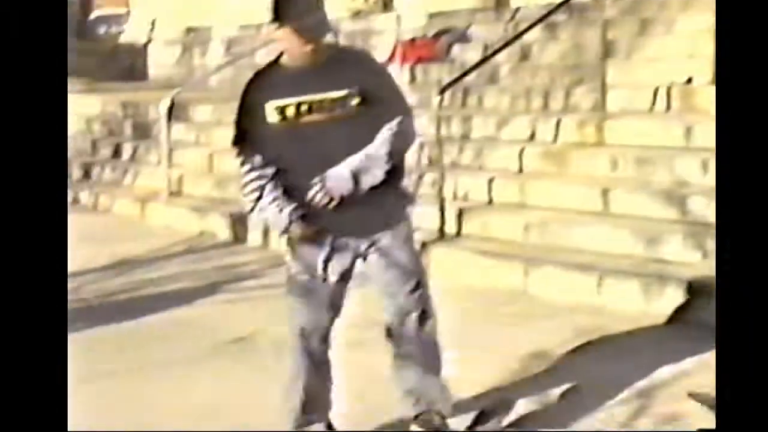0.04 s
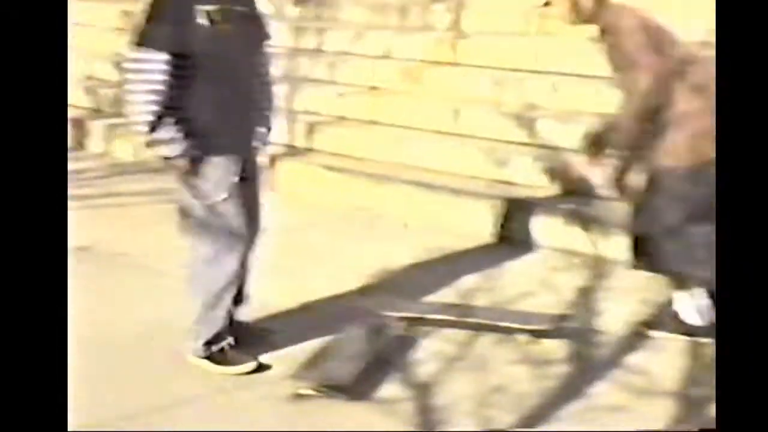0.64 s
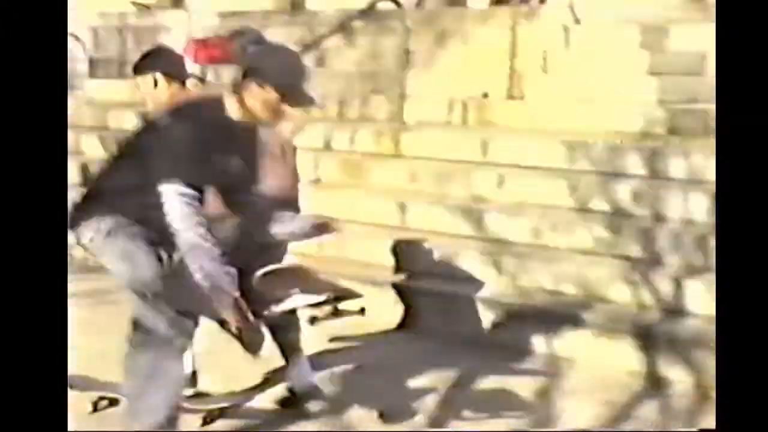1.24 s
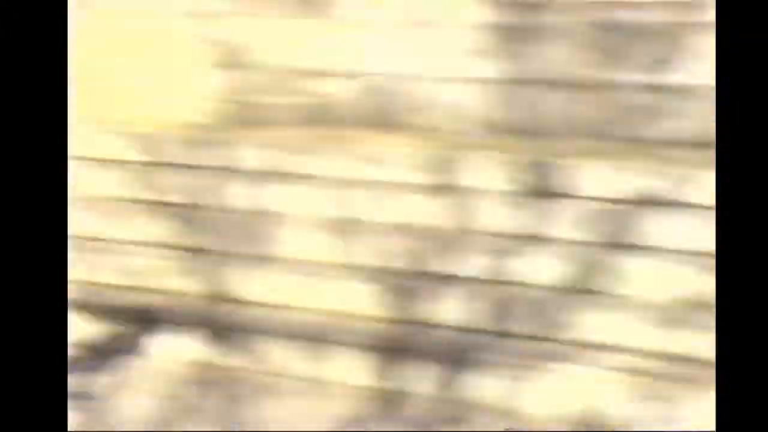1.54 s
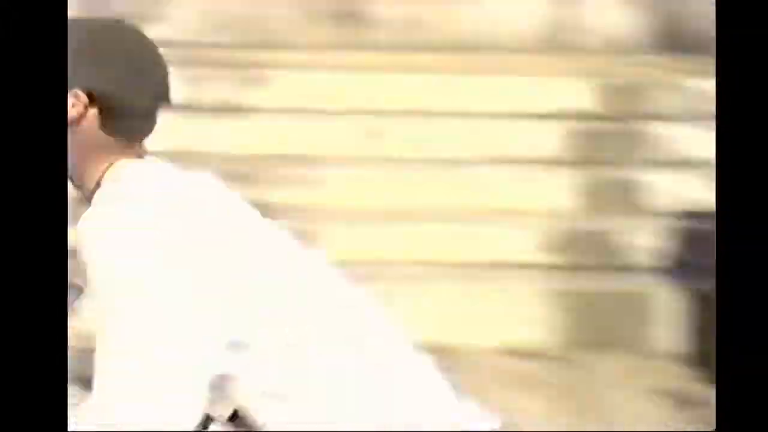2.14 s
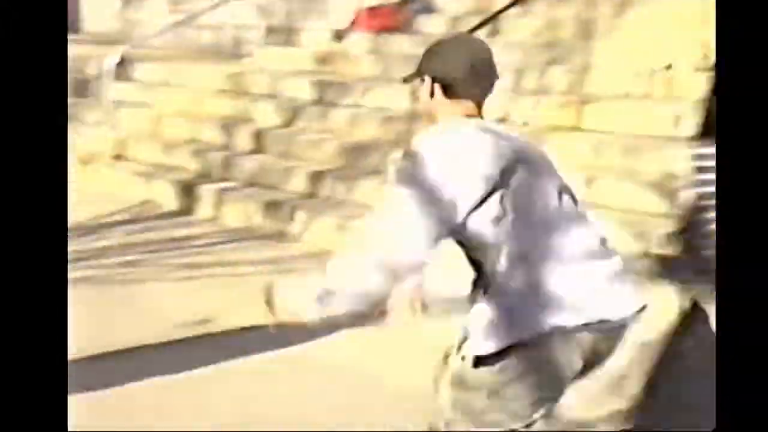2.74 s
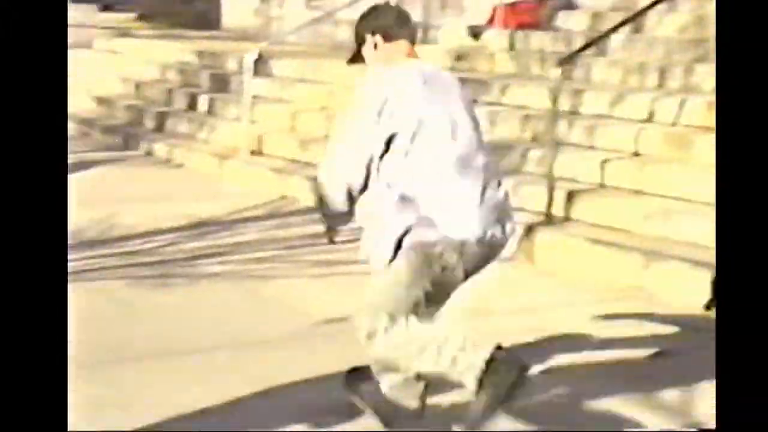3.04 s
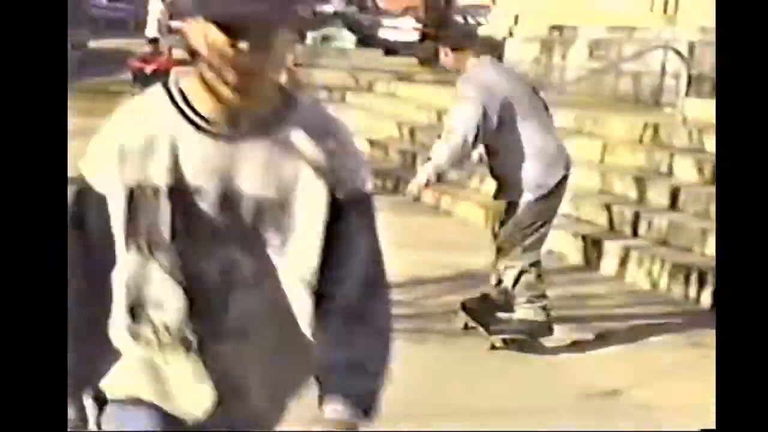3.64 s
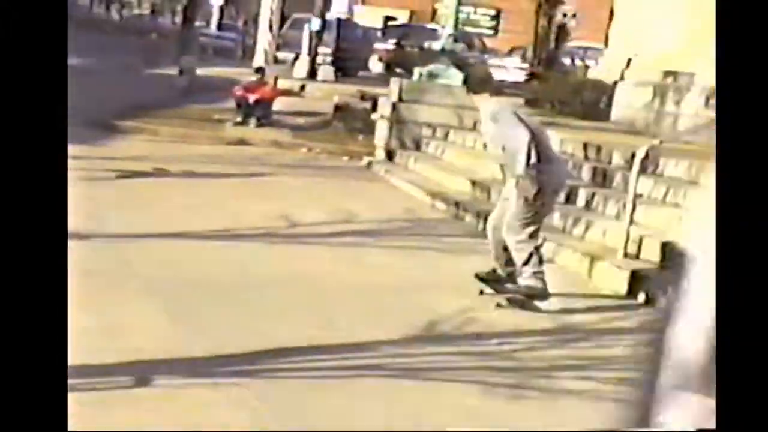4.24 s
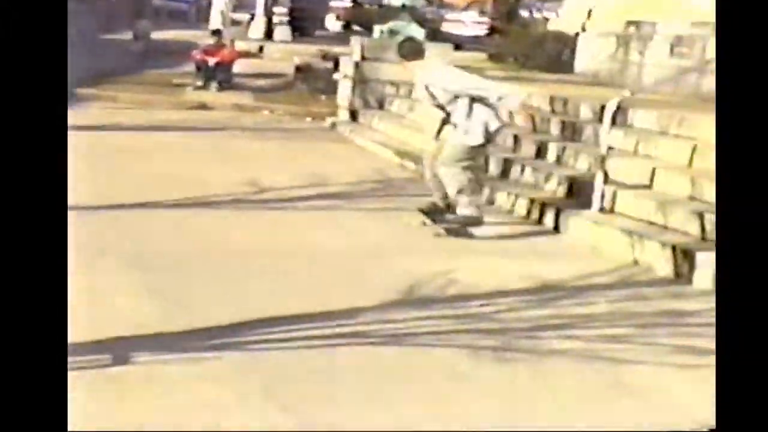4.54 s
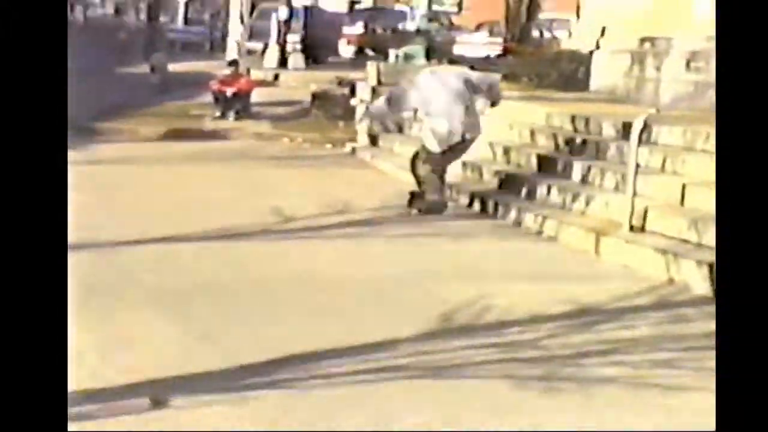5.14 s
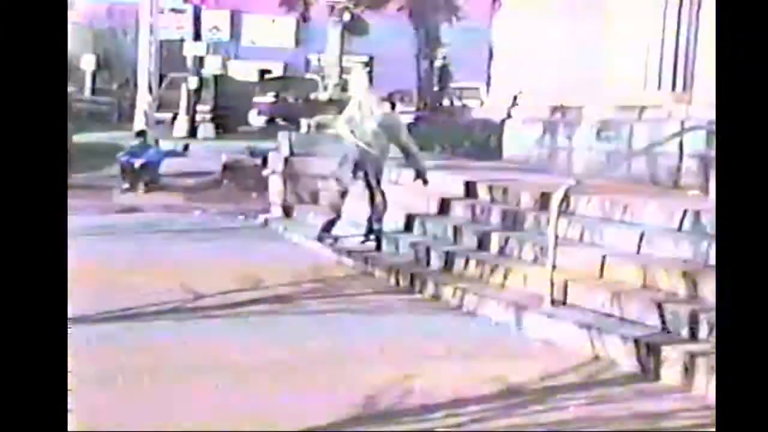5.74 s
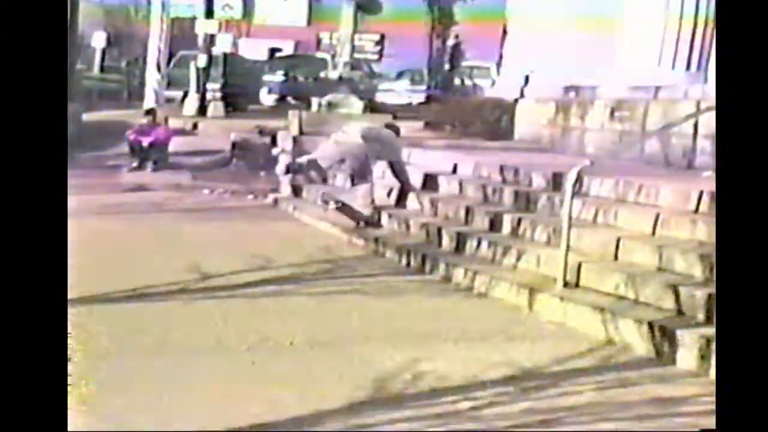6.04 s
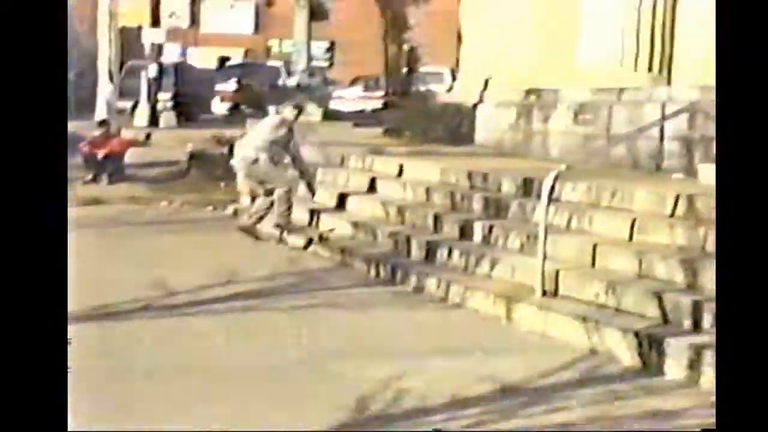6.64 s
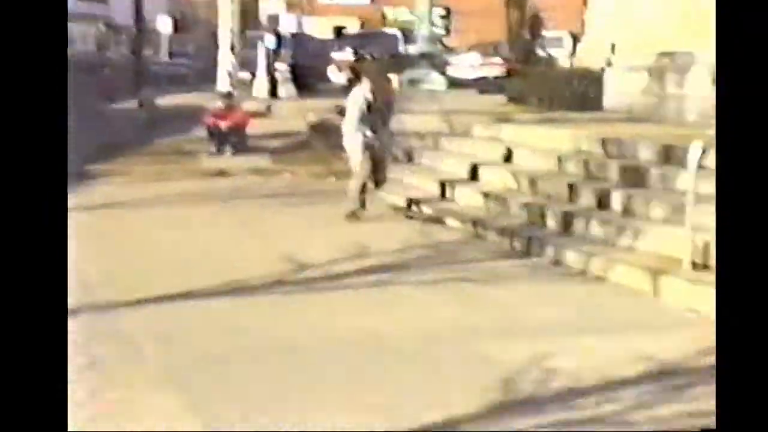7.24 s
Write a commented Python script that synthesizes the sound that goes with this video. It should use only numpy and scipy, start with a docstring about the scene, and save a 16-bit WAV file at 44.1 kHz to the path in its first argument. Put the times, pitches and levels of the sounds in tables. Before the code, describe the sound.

Skateboards clack and knock on a concrete plaza as one rider rumbles past, scrapes the wheels and loses the board.

```python
"""A concrete plaza with stone steps, heard through the mono microphone of an old camcorder.
A few skateboards clack; one rider rolls past about half a metre away, rides off, hits a step and bails.
Hard wheels drum over the grain of the concrete, shake the deck and ring, and grit hisses under them.
Joints and landings knock, wheels scuff sideways, and the steps throw both back. Behind it all lie
town air and the hum of the camcorder, which has a narrow sound track and a quick limiter."""
import sys
import numpy as np
from scipy import signal
from scipy.fft import rfft, irfft
from scipy.io import wavfile
from scipy.ndimage import uniform_filter1d, minimum_filter1d

SR = 44100
rng = np.random.default_rng(int(sys.argv[2]) if len(sys.argv) > 2 else 0)


def file_out(sig):
    """Save sig as 16-bit WAV at sys.argv[1]."""
    # one column per channel
    cols = np.atleast_2d(sig).T
    # limit, then scale
    lim = np.clip(cols, -1, 1)
    pcm = np.round(lim * 32767).astype(np.int16)
    wavfile.write(sys.argv[1], SR, pcm)


N = 321914

# The rolling at the microphone. Each row: time in seconds, then rumble, rasp and grit in relative dB.
ROLL_LEVELS = [(0.36, -51, -40, -30.5), (0.62, -47.5, -40.5, -32.5), (1.03, -47.5, -33.5, -27.5),
               (1.23, -35.5, -25.5, -22.5), (1.4, -34, -27.5, -22), (1.77, -32.5, -26, -24),
               (2.02, -25, -27, -25), (2.32, -28.5, -26.5, -24.5), (2.42, -28.5, -24.5, -20),
               (2.57, -31.5, -26, -24.5), (2.87, -33, -25.5, -25), (3.24, -28.5, -25.5, -26.5),
               (3.6, -26.5, -27.5, -22.5), (3.78, -27.5, -22.5, -22), (3.86, -33.5, -25.5, -26.5),
               (4.35, -31, -29.5, -26), (4.57, -22.5, -29, -30.5), (4.77, -28.5, -31.5, -32),
               (5.07, -30, -25, -25), (5.26, -30, -27.5, -28), (5.6, -26, -24.5, -24.5),
               (5.83, -34.5, -27, -29), (6.06, -32, -27.5, -23.5), (6.28, -31, -28.5, -31),
               (6.42, -33.5, -32.5, -33), (6.48, -34, -26, -25.5), (6.66, -30, -24.5, -25),
               (6.78, -35.5, -26, -21.5), (7.28, -38.5, -32.5, -32.5)]
# Brief dips in the rolling. Each row: middle in seconds, level change in dB.
ROLL_DIPS = [(1.195, -5), (1.405, -6.5), (2.09, -2.5), (2.736, -3.5), (4.015, -4), (7.0, -4)]
# Low throb of the loaded deck. Each row: time in seconds, level against the rumble curve in dB.
DECK_THROB = [(0.9, -17), (1.3, -5), (2.2, -17), (3.2, -10.5), (4.6, -15.5), (5.0, -18)]
# Spectra of deck rumble, wheel rasp and grit hiss. Each row: frequency in Hz, relative level in dB.
RUMBLE_SPECTRUM = [(50, -18.5), (100, -35), (150, -28.5), (220, -3), (340, 2), (430, 0.5), (550, 4),
                   (780, -0.5), (950, -5), (1300, -5), (2000, -68.5)]
RASP_SPECTRUM = [(500, -33), (800, -1.5), (1000, 0), (1150, -1.5), (1400, 2), (1800, 0.5), (2300, -2.5),
                 (2800, -18), (4000, -23)]
GRIT_SPECTRUM = [(1500, -41.5), (2200, -3.5), (2700, -1), (3500, 0), (4200, -1.5), (4900, -0.8),
                 (5800, -3.5), (7000, -11.5), (9000, -7)]
# Wheel resonances. Each row: frequency in Hz, width in Hz, relative level in dB.
WHEEL_MODES = [(566, 55, -7), (682, 42, -2.5), (737.6, 19.5, 1)]
# The wheels' ring bends as the rider carves past. Each row: time in seconds, pitch ratio.
WHEEL_BEND = [(2.0, 1.06), (2.2, 0.99), (2.3, 1.1), (2.45, 1.06), (2.56, 0.95), (3.6, 1.06)]
# Joints in the concrete. Each row: start in seconds, boost of the wheels' ring in dB.
SLAB_JOINTS = [(2.124, 7), (2.19, 9.3), (2.259, 7.1), (2.435, 2.9), (3.643, 9.7)]
# Blows of wheels, tail and deck. Each row: start in seconds, then wooden clack, thump and crack
# in relative dB, and the seconds the rattle takes to fall 60 dB.
BLOWS = [(0.189, -23.5, -45, -65, 0.018), (0.2765, -21, -72, -28, 0.055), (0.403, -17, -30, -29, .11),
         (0.4641, -28, -35, -37, 0.067), (0.4939, -24, -48, -30, 0.1), (0.6722, -33, -68, -31.5, .02),
         (0.9674, -29, -38, -33, 0.089), (1.0769, -19.5, -21, -22.5, 0.076), (1.1071, -23, -29, -30, 0.13),
         (1.153, -27, -31, -26.5, 0.085), (1.2272, -19.5, -20.5, -23, 0.11),
         (1.2968, -15.5, -18, -24, 0.14), (1.4857, -24, -24, -29.5, 0.083), (1.648, -22, -51, -36, 0.12),
         (1.803, -21, -26, -28, 0.098), (2.126, -21, -13, -24.5, .035), (2.179, -23.5, -48, -27.5, 0.21),
         (2.2665, -17, -38, -25, 0.096), (2.444, -18, -17.5, -26, .09), (2.5449, -22, -22.5, -28, 0.043),
         (2.626, -24, -22, -30, 0.12), (2.7713, -25, -21.5, -27.5, 0.099), (3.035, -31, -25, -28, 0.18),
         (3.568, -20, -27, -29, 0.12), (3.6758, -21.5, -19, -35, 0.13), (4.0381, -24.5, -25, -28, 0.11),
         (4.489, -23.5, -19.5, -28.5, 0.13), (4.532, -24, -38, -27, 0.089), (4.647, -27, -25, -27.5, 0.083),
         (4.675, -19, -18.5, -29, 0.068), (5.025, -31, -30, -29, 0.065), (5.141, -30, -26, -26.5, 0.2),
         (5.361, -29, -26, -47, 0.038), (5.4604, -33, -24, -29.5, 0.17), (5.5717, -41, -23.5, -30, 0.11),
         (5.62, -18, -30, -29, 0.21), (5.9006, -25.5, -41, -26.5, 0.11), (6.065, -26, -36, -36, 0.054),
         (6.087, -25, -27, -25, 0.06), (6.1222, -22, -19, -30, 0.08), (6.1878, -17, -41, -25, 0.039),
         (6.328, -31, -29, -28, 0.061), (6.4602, -20, -31, -27, .08), (6.477, -26, -30, -26, 0.087),
         (6.518, -25, -23.5, -29, 0.22), (6.567, -29, -26, -32, 0.14), (6.631, -29, -26, -28.5, 0.1),
         (6.6891, -29, -22.5, -40, .09), (6.7025, -18, -33, -31, 0.09), (6.967, -25, -31.5, -33, 0.083),
         (7.0136, -22, -42, -29, .022), (7.0286, -15.5, -20.5, -21, .05), (7.046, -22, -19.5, -30, 0.048),
         (7.06, -24.5, -29, -34, 0.34), (7.128, -21, -26, -31, 0.045), (7.164, -26.5, -36, -29.5, .09)]
# Deck and truck modes. Each row: frequency in Hz, relative level in dB, seconds to fall 60 dB.
DECK_MODES = [(276, -13, 0.03), (557, 0.5, 0.12), (786, 4, 0.019), (1150, -22, 0.036), (1470, -2.5, 0.044),
              (1740, -5.5, 0.034), (2260, -4.5, 0.016), (3930, -4.5, 0.027)]
# Slides of wheels and soles. Each row: middle in seconds, half length in seconds, centre in Hz,
# level in dB, resonance width as a share of the centre.
SLIDES = [(1.464, 0.024, 4370, -29.5, 0.85), (1.69, 0.04, 2440, -24, 0.42),
          (1.742, 0.062, 2890, -25.5, .11), (1.858, 0.04, 3170, -29, 0.11), (1.973, 0.04, 3900, -24.5, .55),
          (2.29, 0.032, 2620, -24, 0.34), (2.392, 0.038, 1890, -21, 0.31), (2.464, 0.016, 1690, -20, 0.64),
          (2.496, 0.04, 2170, -31, .25), (2.9, 0.04, 3500, -26, .4), (2.932, 0.043, 1740, -28.5, 0.27),
          (3.104, 0.035, 3500, -22, 0.61), (3.203, 0.019, 2500, -19.5, 1), (3.684, 0.022, 950, -22, 0.35),
          (3.8, 0.011, 1292, -17.5, 0.78), (3.802, 0.051, 1750, -27, 0.46), (3.906, 0.042, 1581, -25, 0.79),
          (3.959, 0.0099, 1180, -15.5, 0.63), (5.471, 0.028, 1173, -23, 0.52),
          (5.659, 0.033, 3400, -23, 0.69), (5.724, 0.08, 1990, -26, 1.1), (5.977, 0.045, 5100, -27, 0.44),
          (6.21, 0.022, 3390, -24.5, 0.51), (6.74, 0.021, 3500, -21, 0.61),
          (6.798, 0.041, 4100, -27.5, 0.42), (7.042, 0.008, 3280, -17, 0.47),
          (7.064, 0.0078, 3340, -19, 0.64)]
# The deck gives under the rider. Each row: start in seconds, relative level in dB.
DECK_FLEXES = [(1.964, -33), (2.263, -32), (2.391, -30.5), (2.645, -29), (3.05, -29), (3.2, -23),
               (4.48, -24), (5.576, -43), (6.181, -35), (7.041, -31.5)]
# Spectrum of town air and tape hiss. Each row: frequency in Hz, relative level in dB.
AIR_SPECTRUM = [(30, -23), (60, 10.5), (90, 0.5), (130, -6.5), (185, 2.5), (260, 0), (500, -2.5), (1500, 5),
                (3000, -2.5), (5000, 7), (8000, -6.5)]
# Camcorder motor and mains hum. Each row: frequency in Hz, rms level in dB.
HUM_TONES = [(29.6, -59), (59.6, -54.5), (87, -53), (177.6, -55.5)]

PASS_S, PASS_DISTANCE_M, SPEED_M_PER_S = 2.34, 0.58, 7.1
BAIL_S, SPIN_DOWN_DB_PER_S = 5.72, 29


def rolling():
    """Coarse bumps shake the deck, finer grain rasps through wheels and trucks, grit hisses."""
    rumble_db, rasp_db, grit_db = roll_levels()
    throb_db, = curves(DECK_THROB)
    load = drift(rate_hz=18)  # the wheels press and lift together over the uneven slab
    rumble = colour(grains(per_s=1300, spread_db=1), RUMBLE_SPECTRUM)
    rumble *= from_db(rumble_db - 0.98 + 0.43 * load)
    rasp = colour(grains(per_s=3600, spread_db=2), RASP_SPECTRUM) * from_db(rasp_db - 0.53 + 1.7 * load)
    grit = colour(grains(per_s=18000, spread_db=2), GRIT_SPECTRUM) * from_db(grit_db + 1.1 + 1.6 * load)
    throb = resonate(grains(per_s=120, spread_db=4.5), hz=172, width_hz=69)
    throb = resonate(throb, hz=154, width_hz=430)
    return rumble + rasp + grit + from_db(rumble_db + throb_db) * unit_power(throb)


def roll_levels():
    """Rumble, rasp and grit in dB, rising as the boards start to roll and dipping here and there."""
    t = seconds()
    start_db = 20 * np.log10(np.clip((t - 0.26) / 0.2, 0.3, 1))
    dips_db = sum(db * bell(t - middle_s, width_s=0.038) for middle_s, db in ROLL_DIPS)
    return [level_db + start_db + dips_db for level_db in curves(ROLL_LEVELS)]


def wheel_ring():
    """Bumps keep the hard wheels ringing until the bail, louder at joints and near the microphone."""
    t = seconds()
    bumps = grains(per_s=1500, spread_db=1) * from_db(2 * drift(rate_hz=86))
    ring = sum(from_db(db) * resonate(bumps, hz, width_hz) * (-1) ** k
               for k, (hz, width_hz, db) in enumerate(WHEEL_MODES))
    ring = butterworth(ring, [500, 950], "band")
    power = np.abs(uniform_filter1d(ring ** 2, int(0.072 * SR)))
    ring /= np.sqrt(power + 1e-9)  # holds the level even
    pitch = curves(WHEEL_BEND)[0] + 0.0118 * drift(rate_hz=11.62)  # wanders as the load changes
    ring = np.interp(np.cumsum(pitch), np.arange(N), ring, right=0)
    follow_db = np.minimum(roll_levels()[0], -29) - 5  # grows with the rumble, up to a cap
    distance_m = np.hypot(PASS_DISTANCE_M, SPEED_M_PER_S * (t - PASS_S))  # a straight pass
    near_db = 7 * PASS_DISTANCE_M / distance_m
    joints_db = sum(db * (t > start_s) * bell(t - start_s, width_s=0.031) for start_s, db in SLAB_JOINTS)
    spin_down_db = SPIN_DOWN_DB_PER_S * np.maximum(t - BAIL_S, 0)
    return from_db(follow_db + near_db + joints_db - spin_down_db) * unit_power(ring)


def clacks():
    """Each blow is a sharp contact, a brief crush and a dying truck rattle that set the deck ringing."""
    attack_s, crush_s = 0.0014, 0.0055
    size = SR // 3
    t, out = np.arange(size) / SR, np.zeros(N + size)
    contact = from_db(14.5) * (t == 0)
    noises = rng.standard_normal((len(BLOWS), 3, size))
    spots = rng.standard_normal((len(BLOWS), len(DECK_MODES)))  # each spot on a board has its own ring
    clatter = unit_power(from_db(1.36 * drift(rate_hz=110)))  # loose parts strike again unevenly
    clatter = np.pad(clatter, (0, size))
    for (start_s, clack_db, thump_db, crack_db, t60_s), noise, spot in zip(BLOWS, noises, spots):
        at = int(start_s * SR)
        envelope = np.minimum(t / attack_s, 1) * from_db(-60 * np.maximum(t - crush_s, 0) / t60_s)
        low, middle, high = noise * clatter[at:at + size] * envelope
        clack_hz = 1460 * 2 ** ((clack_db - thump_db) / 58)  # a heavier blow sounds lower
        wood = butterworth(middle + contact, [0.65 * clack_hz, 1.28 * clack_hz], "band")
        blow = from_db(clack_db) * wood * np.sqrt(SR / 2 / clack_hz)  # a wider band keeps the same power
        blow += from_db(thump_db - 4.5) * colour(low, RUMBLE_SPECTRUM)
        blow += from_db(crack_db + 6.5) * colour(high, GRIT_SPECTRUM)
        ring = sum(from_db(db) * resonate(blow, hz * (1 + 0.07 * detune), np.log(1000) / np.pi / ring_s)
                   for (hz, db, ring_s), detune in zip(DECK_MODES, spot))
        out[at:at + size] += blow + from_db(4) * ring
    return out[:N]


def scuffs():
    """A sliding wheel or sole sticks and slips in a chattering band: hoarse if wide, thin if narrow."""
    out, t = np.zeros(N), seconds()
    slips = grains(per_s=12000, spread_db=2)
    chatter = unit_power(from_db(2.5 * drift(rate_hz=50)))
    for middle_s, half_s, hz, db, width in SLIDES:
        span = slice(*np.searchsorted(t, [middle_s - 0.3, middle_s + 0.3]))
        band = resonate(slips[span], hz, width * hz)
        band = unit_power(resonate(band, hz, width * hz))
        out[span] += from_db(db) * band * chatter[span] * bell(t[span] - middle_s, half_s)
    return out


def thuds():
    """The deck flexes under the rider's weight: a few low cycles that swell and die."""
    flex_hz, attack_s, decay_s = 151, 0.003, 0.016
    out, t = np.zeros(N + SR), np.arange(SR // 4) / SR
    envelope = np.minimum(t / attack_s, 1) * np.exp(-t / decay_s)
    for (start_s, db), detune in zip(DECK_FLEXES, rng.standard_normal(len(DECK_FLEXES))):
        swing = np.sin(2 * np.pi * flex_hz * (1 + 0.12 * detune) * t)
        out[int(start_s * SR):][:len(t)] += from_db(db + 2) * swing * envelope
    return out[:N]


def plaza_echoes(x, t60_s, delay_s):
    """The stone steps throw a dense, quickly dying scatter of echoes back to the microphone."""
    t = np.arange(SR) / SR
    scatter = rng.standard_normal(SR) * from_db(-60 * t / t60_s) * (t > delay_s)
    scatter = resonate(scatter, hz=1500, width_hz=9600)
    return signal.fftconvolve(x, scatter / np.linalg.norm(scatter))[:N]


def background():
    """Town air, tape hiss and the camcorder's wavering hum."""
    hum = sum(from_db(db) * np.sqrt(2) * np.sin(2 * np.pi * hz * seconds() + drift(rate_hz=0.86))
              for hz, db in HUM_TONES)
    return hum + from_db(-37) * colour(rng.standard_normal(N), AIR_SPECTRUM)


def limiter(x, ceiling_db, release_db_per_s):
    """The camcorder's gain drops just in time for loud peaks and creeps back."""
    over_db = np.maximum(20 * np.log10(np.abs(x) + 1e-9) - ceiling_db, 0)
    creep_db = release_db_per_s * seconds()
    gain_db = creep_db - np.maximum.accumulate(over_db + creep_db, axis=-1)
    return x * from_db(uniform_filter1d(minimum_filter1d(gain_db, size=24), size=24))


def grains(per_s, spread_db):
    """Random tiny impacts of uneven size, at unit power."""
    sizes = from_db(spread_db * np.minimum(rng.exponential(1, N), 4)) * rng.choice([-1, 1], N)
    return unit_power(sizes * (rng.random(N) < per_s / SR))


def drift(rate_hz):
    """A smooth random wander with a spread of about 1."""
    step, settle = 20, 2000
    pole = np.exp(-2 * np.pi * rate_hz * step / SR)
    noise = rng.standard_normal(N // step + settle + 2)
    slow = signal.lfilter([1], [1, -2 * pole, pole * pole], noise)[settle:]
    return np.interp(np.arange(N) / step, np.arange(len(slow)), unit_power(slow))


def colour(x, spectrum):
    """A causal filter with the given spectrum; white noise keeps its power."""
    size = 4096
    hz, db = np.transpose(spectrum)
    bins_hz = np.arange(size // 2 + 1) * SR / size
    gain = from_db(np.interp(np.log(bins_hz + 1), np.log(hz), db))
    cepstrum = irfft(np.log(gain))
    cepstrum[1:size // 2] *= 2  # folded for minimum phase
    cepstrum[size // 2 + 1:] = 0
    response = irfft(np.exp(rfft(cepstrum)))
    return signal.fftconvolve(x, response / np.linalg.norm(response))[:len(x)]


def resonate(x, hz, width_hz):
    """A resonance with gain 1 at its peak."""
    r = np.exp(-np.pi * width_hz / SR)
    feedback = [1, -2 * r * np.cos(2 * np.pi * hz / SR), r * r]
    return signal.lfilter(np.array([1, 0, -1]) * (1 - r * r) / 2, feedback, x)


def butterworth(x, hz, kind, order=2):
    """A filter with a flat passband."""
    return signal.sosfilt(signal.butter(order, hz, kind, fs=SR, output="sos"), x)


def bell(t, width_s):
    """A smooth bump, 1 at time zero and 1/e at width_s either side."""
    return np.exp(-(t / width_s) ** 2)


def curves(rows):
    """Each column after the time column, interpolated at every sample."""
    times_s, *columns = np.transpose(rows)
    return [np.interp(seconds(), times_s, column) for column in columns]


def from_db(db):
    """Decibels to gain."""
    return 10 ** (np.asarray(db) / 20)


def unit_power(x):
    """Scale to an rms of 1."""
    return x / np.sqrt(np.mean(x ** 2) + 1e-20)


def seconds():
    """The time of every sample."""
    return np.arange(N) / SR


def scene():
    """At the microphone, in mono: the boards, echoes of their clacks and scuffs, and the background."""
    contacts = clacks() + scuffs()
    boards = rolling() + wheel_ring() + thuds() + contacts
    echoes = from_db(-10) * plaza_echoes(contacts, t60_s=0.65, delay_s=0.009)
    return (boards + echoes + background())[None]


def record(dry):
    """The camcorder's narrow, limited track, whose rounded peaks add a faint fizz above its edge."""
    edge_hz, saturation, line_hz = 6580, 0.56, 15732
    narrow = butterworth(dry, edge_hz, "low", order=12)
    limited = limiter(narrow, ceiling_db=-6.5, release_db_per_s=83)
    rounded = saturation * np.tanh(from_db(0.29) * limited / saturation)
    track = butterworth(rounded + from_db(-60) * rng.standard_normal(N), 11000, "low")
    track += from_db(-71) * np.sin(2 * np.pi * line_hz * seconds())  # the picture's line whistle leaks in
    top_cut = signal.ellip(12, 0.1, 80, 15800, fs=SR, output="sos")
    offset = 0.498  # the converter rests off centre, a constant that makes no sound
    return offset + signal.sosfilt(top_cut, track)


dry = scene()
out = record(dry)
file_out(out)
```